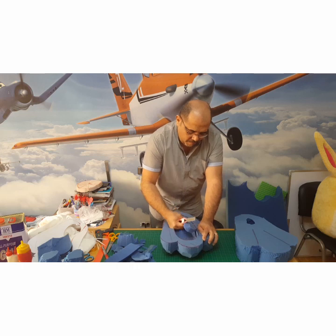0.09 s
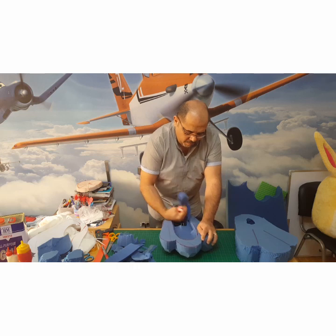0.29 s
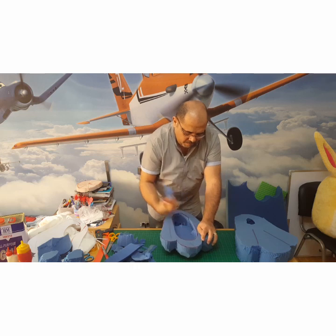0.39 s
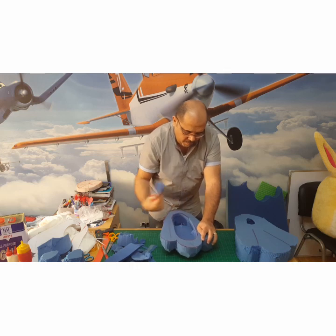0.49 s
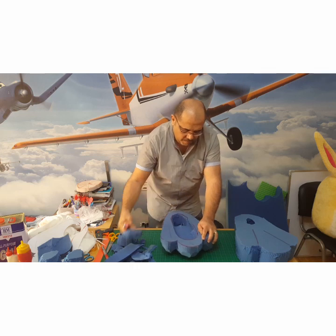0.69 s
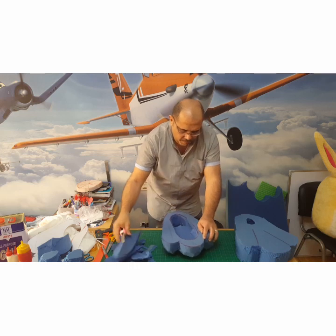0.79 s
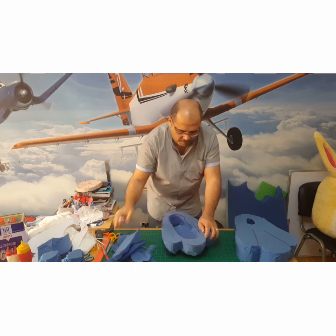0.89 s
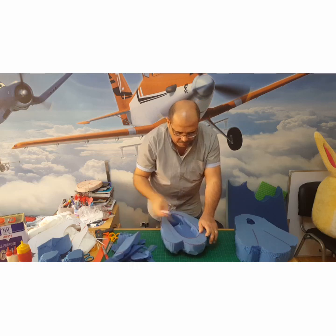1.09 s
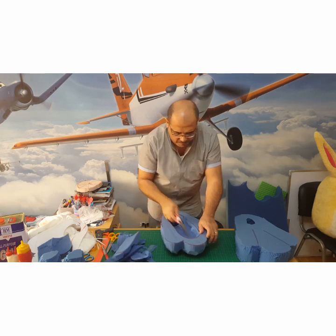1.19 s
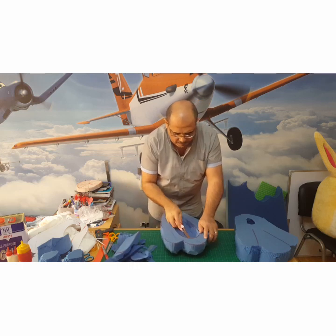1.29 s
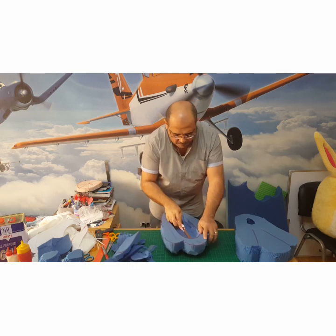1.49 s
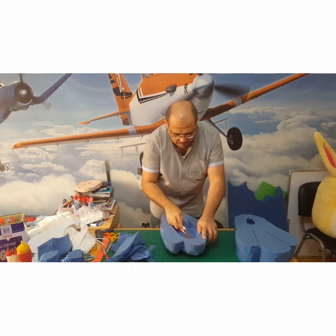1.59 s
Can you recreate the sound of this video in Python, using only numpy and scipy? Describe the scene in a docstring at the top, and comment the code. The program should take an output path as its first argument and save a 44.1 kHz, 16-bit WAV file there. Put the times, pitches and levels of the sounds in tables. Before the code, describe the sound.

Thick foam tears with a short rasping rip and dull hollow pop, then soft bench bumps

```python
"""A scrap of foam is torn out of a block on a workbench and dropped; then a hand and a knife go back to the block.
First the foam rubs and tears: thousands of tiny random snaps make a hiss, and noise rings the bench along with it.
The tear ends in a dull pop, a crackle ringing the hollow block; a fainter pop follows.
From start to end soft bumps ring the bench top. Late on the knife handle ticks: a short crack plus dying sines.
Under it all lie room echo, made of scattered random taps, and steady room tone and hiss, made of shaped noise."""
import sys
import numpy as np
from scipy import signal
from scipy.fft import rfft, irfft
from scipy.io import wavfile

SR = 44100
rng = np.random.default_rng(int(sys.argv[2]) if len(sys.argv) > 2 else 0)


def undo_db(level):
    """Turn decibels back into plain size, where 20 dB means ten times bigger."""
    steps = np.asarray(level, float) / 20
    return 10 ** steps


def unload_wav(signal):
    """Save mono or channel-first audio to the path in sys.argv[1] as 16-bit WAV at rate SR, clipped to [-1, 1]."""
    wavfile.write(
        sys.argv[1],
        SR,
        np.round(np.clip(np.atleast_2d(signal).T, -1, 1) * 32767).astype(np.int16),
    )


N = 70560  # length in samples (1.6 s)


def evened(x):
    """Scales a sound to an average strength (rms) of 1."""
    return x / np.sqrt(np.mean(x ** 2) + 1e-20)


def read(points, hz):
    """Reads a table of (pitch_hz, value) between its points, on a logarithmic pitch axis."""
    pitch_hz, value = np.transpose(points)
    return np.interp(np.log(hz + 1), np.log(pitch_hz + 1), value)


def add(mix, start_s, sound):
    """Mixes a sound in at its start time, cut off where the mix ends."""
    part = mix[round(start_s * SR):][:len(sound)]
    part += sound[:len(part)]


def ring(modes, centre_hz=1000, octaves=99., rise_s=.0002, ring_share=1):
    """A struck object: dying sines, louder near centre_hz as the struck spot favours them; peak 1."""
    pitch_hz, level_db, t60_s = np.transpose(modes)[:, :, None]
    t = np.arange(SR // 2) / SR
    distance = np.log2(pitch_hz / centre_hz) / max(octaves, .1)
    favour = np.exp(-.5 * distance ** 2)
    fade = undo_db(level_db - 60 * t / (t60_s * ring_share))
    sines = favour * fade * np.sin(2 * np.pi * pitch_hz * t)
    out = sines.sum(0) * (1 - np.exp(-t / rise_s))
    return out / abs(out).max()


def crackle(noise, length_s):
    """A burst of noise with total energy 1, falling to about a third of its height in length_s."""
    burst = noise * np.exp(-np.arange(len(noise)) / SR / length_s)
    return burst / np.linalg.norm(burst)


# How the foam is rubbed and torn: start_s, level_db,
# dullness_db (per octave going down in pitch, turning about KNEE_HZ), shake_db (bench shaking against level_db)
RUB_MOVES = [(0, -74.5, 2.5, 2), (.07, -75, 1.5, -29), (0.126, -63, -1.5, -12), (0.194, -56.5, 1, -11),
             (0.211, -45.5, 1, -25), (.3, -57, 0, -22), (0.392, -72.5, 1, -19), (0.419, -60, -1, -5),
             (0.441, -51, -0.5, -29), (.475, -65, 0, -22), (.592, -80, -2.5, -17),
             (.828, -82.5, -1.5, -25.5), (.894, -71, 1.26, -29), (1.06, -73, 0.5, -12),
             (1.09, -70.5, -1.5, -16), (1.166, -77.5, -1, 3), (1.382, -78.5, -1, -21), (1.4, -69, -2, -16),
             (1.529, -82.5, 6.5, -2), (1.543, -69, -2.5, 12), (1.6, -76, -0.5, -13)]
# Tone colour of the foam hiss as the microphone hears it: pitch_hz, level_db (per Hz, relative)
HISS_COLOUR = [(180, -8), (300, -2), (800, -8), (2100, -10.5), (5400, -22.5), (8700, -24.5), (9700, -34.5),
               (12000, -33), (15800, -32)]
KNEE_HZ, CELLS_PER_S = 2500, 14000
CELL_SPREAD_DB = 2  # average extra loudness of a random cell, before the cap
RUB_SAME = 0.39  # share of the hiss power that both sides have in common, at high pitch


def foam_hiss():
    """Foam cells snap densely at random moments; a tone colour shapes the hiss as the microphone hears it."""
    start_s, level_db, dullness_db, _ = np.transpose(RUB_MOVES)
    cell_db = CELL_SPREAD_DB * np.minimum(rng.exponential(1, N), 5)
    cells = rng.standard_normal((3, N)) * undo_db(cell_db)
    cells *= rng.random(N) < CELLS_PER_S / SR
    sides = np.sqrt(RUB_SAME) * cells[:1] + np.sqrt(1 - RUB_SAME) * cells[1:]
    hz, t, z = signal.stft(sides, SR, nperseg=256)
    wide = np.clip(hz / 600, 0, 1)[:, None]  # long waves reach both sides alike
    z = (wide * z + (1 - wide) * z[0]) * undo_db(read(HISS_COLOUR, hz))[:, None]
    # even out the strength above half the knee, before the dullness is applied
    z = z / np.sqrt((abs(z[:, hz > KNEE_HZ / 2]) ** 2).sum(1).mean() * 4 / 3)
    octaves_down = np.log2(KNEE_HZ / np.maximum(hz, 300))[:, None]
    tilt_db = octaves_down * np.interp(t, start_s, dullness_db)
    hiss = signal.istft(z * undo_db(tilt_db), SR, nperseg=256)[1][:, :N]
    return hiss * undo_db(np.interp(np.arange(N) / SR, start_s, level_db))


# Hollow ring of the foam block: pitch_hz, level_db (relative), t60_s (time to fade by 60 dB)
BLOCK_MODES = [(670, -20, 0.056), (848, 3, 0.094), (1100, 3, 0.091), (1190, 8, 0.093), (1222, 7.5, 0.058),
               (1440, -10, 0.15), (1945, -13, 0.17), (2245, -27, 0.095), (2680, -28, 0.025)]
# Pops of the block: start_s, level_db, length_s (of the crackle)
BLOCK_POPS = [(.209, -29.5, 0.0045), (.434, -48, 0.0086)]


def block_pops():
    """The end of a tear is a short crackle that sets the hollow block ringing."""
    pops = np.zeros(N)
    for start_s, level_db, length_s in BLOCK_POPS:
        burst = crackle(rng.standard_normal(2048), length_s)
        add(pops, start_s, undo_db(level_db) * signal.fftconvolve(ring(BLOCK_MODES), burst))
    return pops


# Ring of the bench top: pitch_hz, level_db (relative), t60_s (time to fade by 60 dB)
BENCH_MODES = [(52, -25, 0.21), (75, -6, 0.42), (114, 2.5, 0.4), (140, -14, 0.6), (178, -3, 0.44),
               (214, 6.5, 0.062), (238.6, -9, 0.25), (325, 0.5, 0.11), (373, -2.5, 0.084),
               (419.4, -4.5, 0.15), (482.6, -8, 0.13), (583, -3.5, .12), (683, -14, 0.16)]
# Soft bumps on the bench: start_s, peak_db, favoured_hz, spread_octaves,
# ring_share (ring time of each bump against the t60_s in the table above, shorter or longer)
BENCH_BUMPS = [(.022, -49, 181, 0.53, 0.64), (0.136, -61.5, 140, 0.26, 0.54),
               (0.2123, -25.5, 211.3, 0.24, 1.2), (.213, -38.5, 89, .6, 0.88),
               (.247, -37.5, 181, 0.22, 1.27), (.275, -41.5, 100, 0.53, 1.1), (.325, -42, 181, 0.32, 0.63),
               (.39, -44, 178, 0.18, 0.5), (0.434, -44, 114, 0.25, 0.85), (.444, -37, 325, 0.17, 0.64),
               (0.514, -51, 340, 0.5, 0.66), (0.579, -54.5, 114, 0.24, .6), (0.659, -64.5, 314, 0.22, 2.2),
               (0.709, -61.5, 114, 0.16, 0.42), (0.855, -57, 530, 0.47, .9), (.872, -44.5, 221, 0.46, 1.06),
               (0.881, -50.5, 75, 0.14, 1.05), (.891, -44.5, 178, 0.34, .9), (.925, -49, 111, 1, 0.67),
               (0.948, -49.5, 132, 0.99, 0.63), (0.994, -57, 168, 0.31, 0.52),
               (1.121, -59, 148, 0.77, 0.51), (1.21, -61, 140, 0.77, 0.61), (1.393, -51, 162, 0.32, 0.53),
               (1.445, -62, 164, 0.33, 0.48)]


def bench_bumps():
    """Soft bumps ring the bench top with a gentle rise, each for a shorter or longer time."""
    bumps = np.zeros(N)
    for start_s, peak_db, favoured_hz, octaves, ring_share in BENCH_BUMPS:
        bump = ring(BENCH_MODES, favoured_hz, octaves, rise_s=0.0034, ring_share=ring_share)
        add(bumps, start_s, undo_db(peak_db) * bump)
    return bumps


def bench_shake():
    """The effort of rubbing shakes the bench: steady noise rings its low modes, following the rub."""
    start_s, level_db, _, shake_db = np.transpose(RUB_MOVES)
    t = np.arange(N) / SR
    shake = evened(signal.fftconvolve(rng.standard_normal(N), ring(BENCH_MODES, 99, 2.0), "same"))
    return shake * undo_db(np.interp(t, start_s, level_db) + np.interp(t, start_s, shake_db))


# Ring of the knife handle: pitch_hz, level_db (relative), t60_s (time to fade by 60 dB)
KNIFE_MODES = [(2000, -3.5, 0.056), (2500, -1, 0.023), (2944, -7, 0.038), (3045, -19, 0.15),
               (3730, -5.5, 0.031), (3910, -0.5, 0.044), (4320, -11, 0.045), (4940, -15.5, 0.05),
               (6800, -7, 0.02), (8100, -20, .03)]
# Ticks of the knife: start_s, peak_db (of the ring), favoured_hz, spread_octaves
KNIFE_TICKS = [(1.076, -54, 2700, 0.23), (1.09, -60.5, 3480, 0.63), (1.292, -66, 2740, 0.32),
               (1.386, -53, 3500, 1.1), (1.455, -60.5, 2200, 0.76), (1.535, -55, 3900, .9),
               (1.542, -57, 2500, 1.5), (1.55, -65, 3050, 0.15), (1.57, -63, 3030, 0.12),
               (1.448, -68.5, 6800, 0.31)]
CRACK_S, CRACK_HZ = .0025, 4870  # fading time of the crack, and where its treble starts to fall
CRACK_DB = -11.5  # crack against ring, before 2.2 dB more per octave of spread


def knife_ticks():
    """Each tick is a wide, short crack of noise together with the ring of the handle."""
    ticks = np.zeros(N)
    r = np.exp(-2 * np.pi * CRACK_HZ / SR)
    smoothing = np.convolve([1, -r], [1, -.9])
    for start_s, peak_db, favoured_hz, octaves in KNIFE_TICKS:
        add(ticks, start_s, undo_db(peak_db) * ring(KNIFE_MODES, favoured_hz, octaves))
        noise = signal.lfilter([1, -1], smoothing, rng.standard_normal(1024))
        crack = crackle(noise, CRACK_S)
        crack_db = peak_db + CRACK_DB + 2.2 * octaves
        add(ticks, start_s, undo_db(crack_db) * crack / abs(crack).max())
    return ticks


# How long the room echoes: pitch_hz, t60_s (time to fade by 60 dB)
ROOM_FADE = [(100, 0.84), (500, 0.53), (2000, 0.5), (8000, 0.36)]


def room_echo(x):
    """Sparse echoes of random sign, different on each side, each pitch dying at its own speed."""
    taps = np.zeros((2, SR // 2))
    slots = np.arange(200, SR // 2 - 20, 20)  # one echo at a random place in every 20 samples
    at = slots + rng.integers(0, 20, (2, len(slots)))
    np.put_along_axis(taps, at, rng.choice([-1., 1.], at.shape), 1)
    hz, t, z = signal.stft(taps, SR, nperseg=256)
    wide = np.clip(hz / 700, 0, 1)[:, None] ** 2  # long waves reach both sides alike
    z = wide * z + (1 - wide) * z[0]
    fade = undo_db(-60 * t / read(ROOM_FADE, hz)[:, None])
    tail = signal.istft(z * fade, SR, nperseg=256)[1]
    tail = tail / np.linalg.norm(tail[0])
    return signal.fftconvolve(x * np.ones((2, 1)), tail, axes=1)[:, :N]


# Tone colour of room tone and microphone hiss: pitch_hz, level_db (per Hz, relative)
AIR_COLOUR = [(12, -52), (35, -28), (59, -0.5), (88, -9.5), (200, -12.5), (374, -16.5), (1000, -21),
              (3000, -30.5), (8000, -41), (10000, -39), (12000, -35), (13300, -36.5), (14500, -36.5),
              (15800, -28)]
# Likeness of left and right: pitch_hz, likeness (1 alike, 0 unrelated, below 0 partly opposite)
AIR_LIKENESS = [(60, 0.9), (180, 0.84), (550, 0.57), (1650, -0.2), (4970, -0.35), (15000, -0.27)]


def room_air():
    """Steady room tone and hiss: noise shaped in pitch, with its own left-right likeness; rms -65 dB."""
    hz = np.fft.rfftfreq(N, 1 / SR)
    left, other = rfft(rng.standard_normal((2, N)))
    same = np.clip(read(AIR_LIKENESS, hz), -1, 1)
    right = same * left + np.sqrt(1 - same ** 2) * other
    noise = irfft(np.array([left, right]) * undo_db(read(AIR_COLOUR, hz)), N)
    return undo_db(-65) * evened(noise)


def scene():
    """Bench sounds a little to the left with their room echo, over the steady air."""
    hiss, bumps = foam_hiss(), bench_bumps()
    hits = block_pops() + knife_ticks()
    direct = hiss + bumps + hits + bench_shake()
    into_room = undo_db(-5) * hiss + undo_db(-9.5) * bumps + undo_db(-8) * hits
    bench = direct + room_echo(into_room)
    side_db = np.array([[1.1], [-1.1]])  # left up, right down
    return bench * undo_db(side_db) + room_air()


def roll_off(x):
    """The treble ends steeply here."""
    return signal.sosfilt(signal.butter(12, 15890, fs=SR, output="sos"), x)


def record(dry):
    """Cuts off the treble above 15950 Hz with a steep filter and returns the finished mix."""
    lowpass = signal.firwin(511, 15950, window=("kaiser", 9), fs=SR)
    mix = signal.oaconvolve(dry, lowpass[None], "same")
    return roll_off(mix)


dry = scene()
out = record(dry)
unload_wav(out)
```